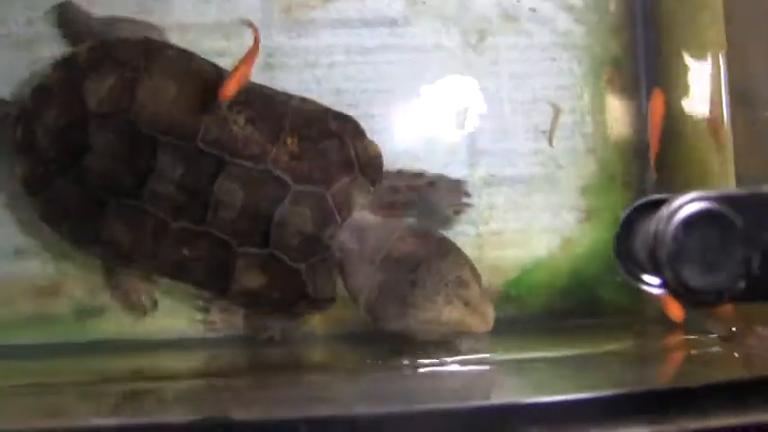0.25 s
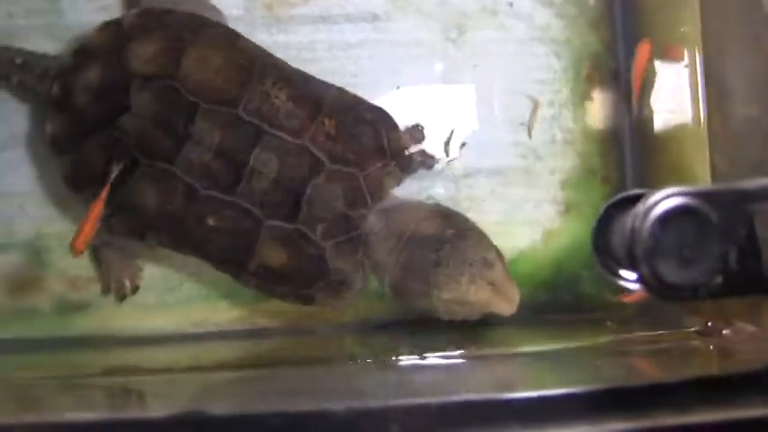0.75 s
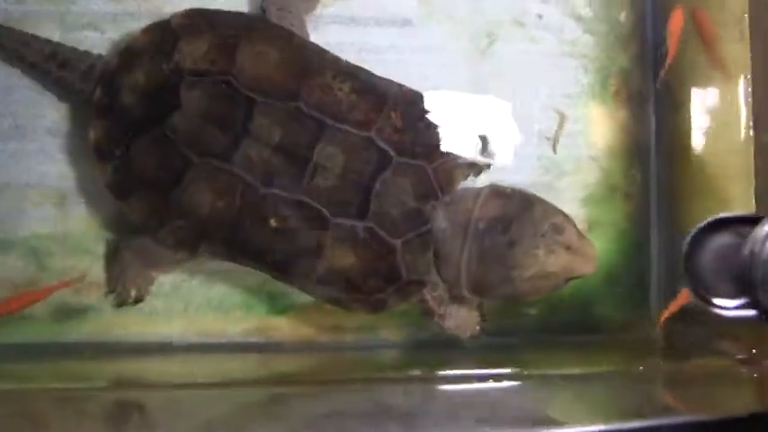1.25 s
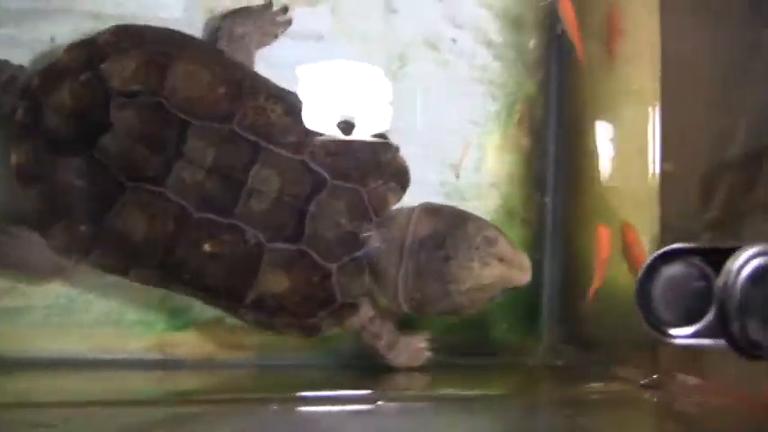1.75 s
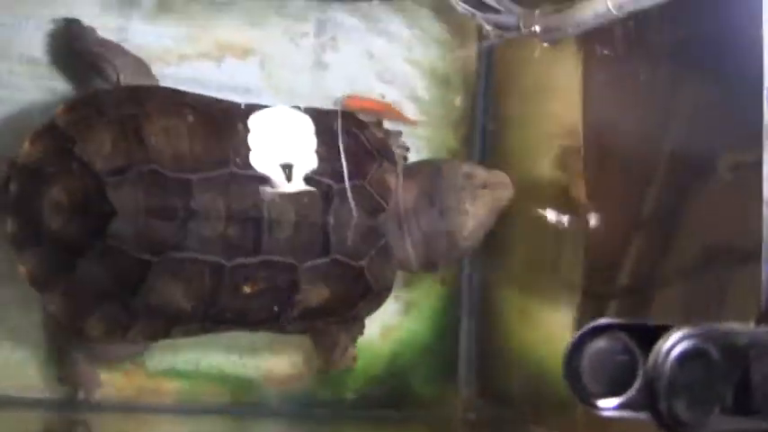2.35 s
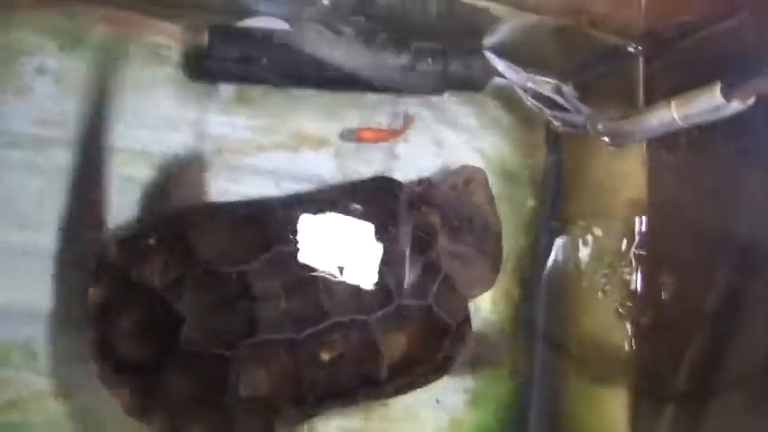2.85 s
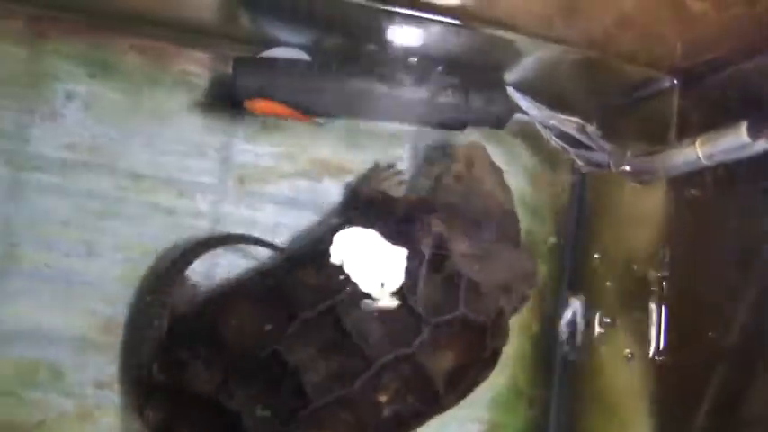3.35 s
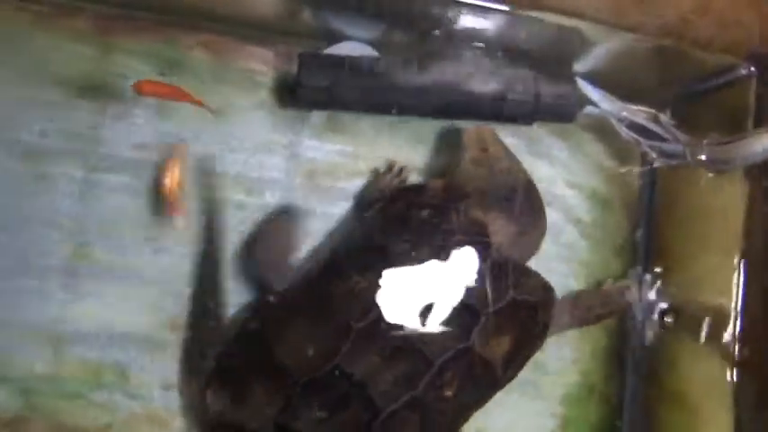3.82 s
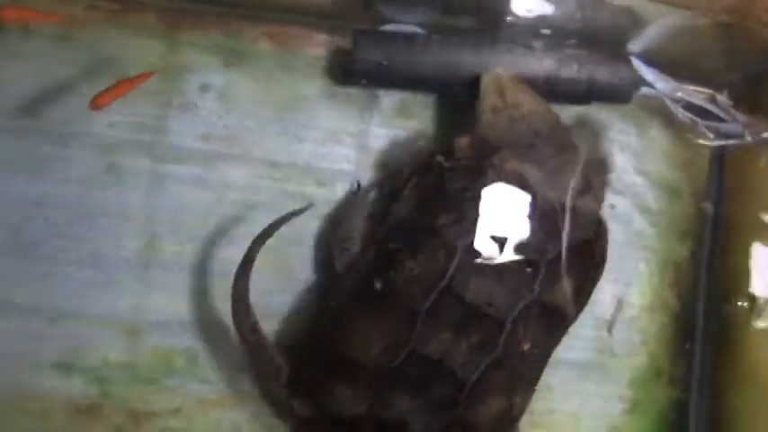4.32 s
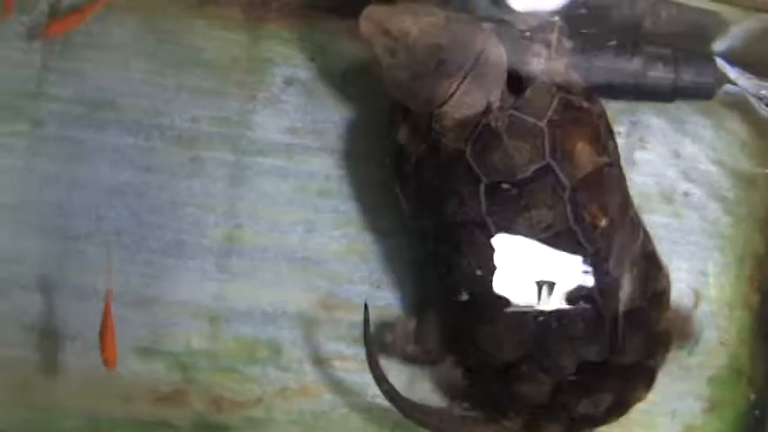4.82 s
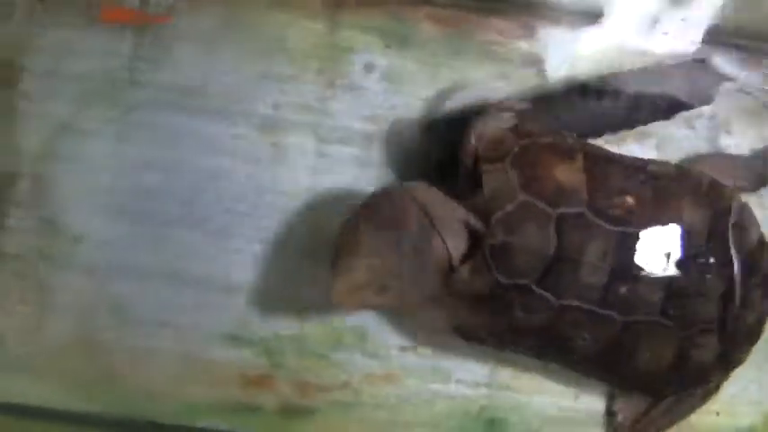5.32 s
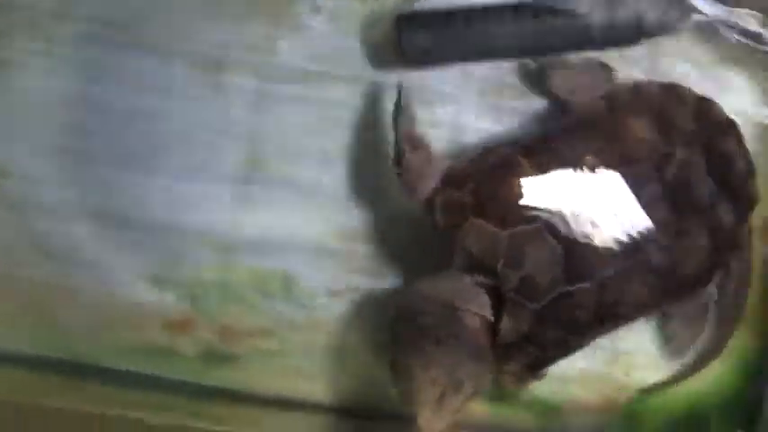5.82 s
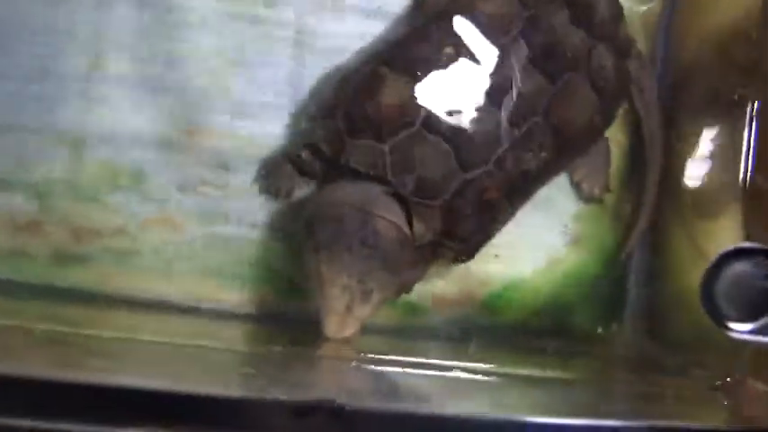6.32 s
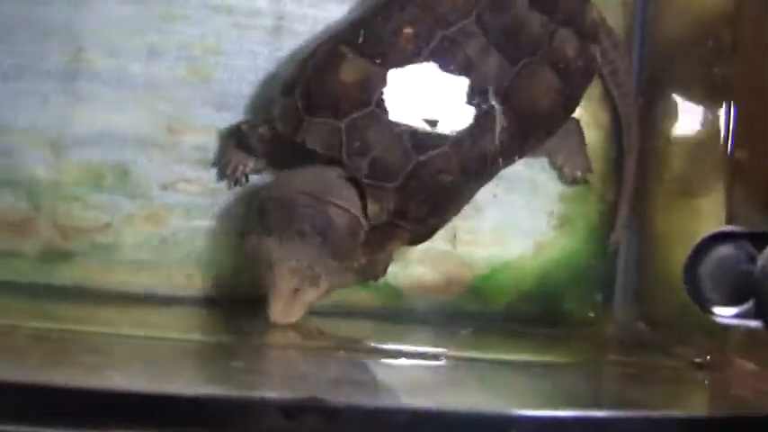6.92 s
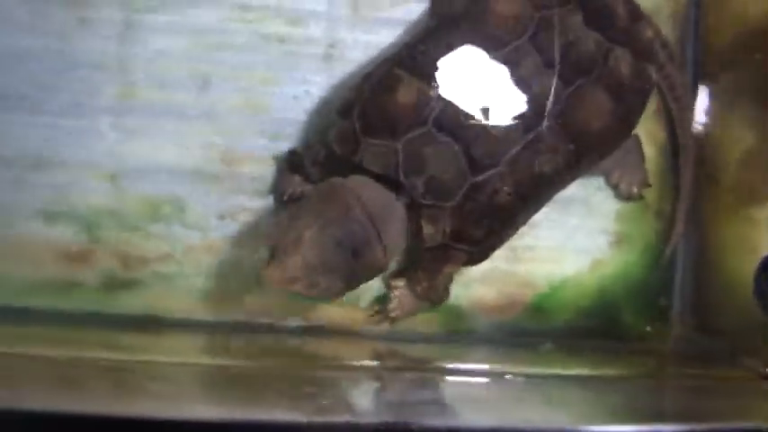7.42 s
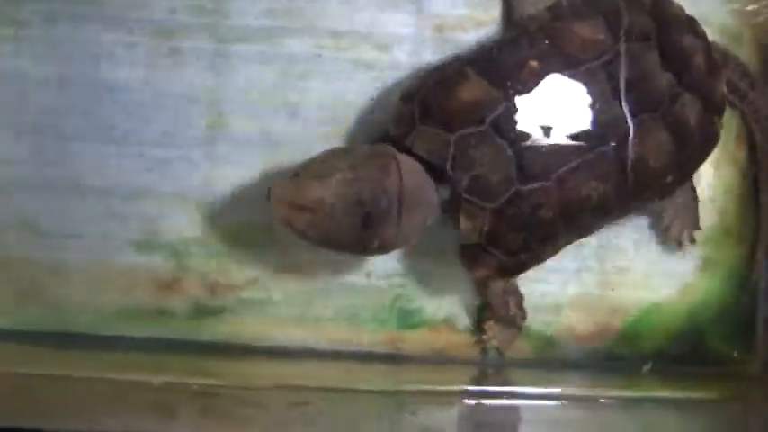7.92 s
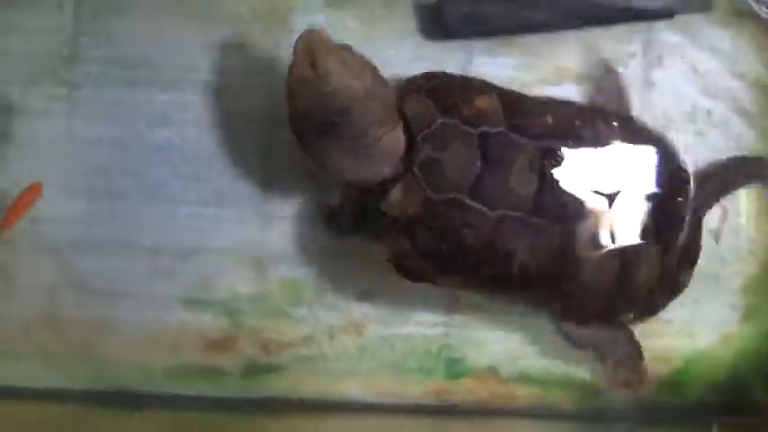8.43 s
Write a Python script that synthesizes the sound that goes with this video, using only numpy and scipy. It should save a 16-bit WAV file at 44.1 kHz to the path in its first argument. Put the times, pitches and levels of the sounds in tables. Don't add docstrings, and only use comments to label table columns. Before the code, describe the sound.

Close above a shallow glass tank in a small quiet room, a turtle bumps and claws the panes. An early knock and sparse ticks lead to a claw skid and one hard, rattling blow. Firm hollow knocks and grinding follow, then lighter taps thin out to almost nothing before two brief late scrabbles. A low pump hum and soft hiss continue underneath.

```python
import sys
import numpy as np
from scipy import signal
from scipy.io import wavfile

SR = 44100
rng = np.random.default_rng(int(sys.argv[2]) if len(sys.argv) > 2 else 0)


def how_loud(loudness_db):
    steps = np.asarray(loudness_db, float) / 20
    return 10 ** steps


def transcribe(u):
    v = np.clip(np.atleast_2d(u).T, -1, 1)
    q = np.round(v * 32767).astype(np.int16)
    wavfile.write(sys.argv[1], SR, q)


N = 382347


def rms_one(x):
    return x / np.sqrt(np.mean(x ** 2) + 1e-20)


def at_hz(points, hz, axis=1):
    points = np.array(points)
    return np.interp(np.log(hz), np.log(points[:, 0]), points[:, axis])


def in_time(rows, axis=1, outside=-140):
    rows = np.array(rows)
    return np.interp(np.arange(N) / SR, rows[:, 0], rows[:, axis], outside, outside)


def band(x, low_hz, high_hz, order=2):
    edges = np.clip([low_hz, high_hz], 10, SR * .45)
    return signal.sosfilt(signal.butter(order, edges, "band", fs=SR, output="sos"), x)


def drift(rate_hz):
    r = np.exp(-80 * np.pi * rate_hz / SR)
    slow = signal.lfilter([1], [1, -2 * r, r * r], rng.standard_normal(N // 40 + 2002))[2000:]
    return np.interp(np.arange(N) / 40, np.arange(len(slow)), rms_one(slow))


def ring(x, hz, t60):
    r, w = how_loud(-60 / (t60 * SR)), 2 * np.pi * hz / SR
    return signal.lfilter([0, np.sin(w)], [1, -2 * r * np.cos(w), r * r], x + 1e-18)


def grit(per_s, spread_db):
    sizes = how_loud(spread_db * np.minimum(rng.exponential(1, N), 5)) * rng.choice([-1, 1], N)
    return rms_one(sizes * (rng.random(N) < per_s / SR))


def half_octaves():
    edges = 20 * 2 ** np.arange(0, 10, .5)
    return zip(edges, edges[1:], np.sqrt(edges[1:] * edges[:-1]))


def panes():
    # (frequency [Hz], level [dB], t60 [s],
    # extra when struck in the corner [dB], extra when struck on the long wall [dB])
    modes = [(88.6, -15.5, 0.52, 8, 2.5), (161.3, -2.5, 0.2, -4, -1), (207.4, 2.5, 0.088, -1, -1),
             (247.3, 0, 0.088, 1.5, 4), (283, 4.5, 0.044, -4.5, -1), (319, -5, 0.12, 1.5, -1.5),
             (383, -12, 0.3, -1.5, -5.5), (396, -14.5, 0.1, -6.5, -3), (446.4, -21.5, 0.27, 3.5, 0),
             (532, -9.5, 0.11, 1.5, 0), (583, -19.5, 0.087, 8, -15), (604.5, -8.5, 0.078, -2, 5.5),
             (659, -7, 0.12, -2, -3), (703.7, -3.5, 0.08, -1, 3), (789, -16.5, 0.16, -1.5, -16.5),
             (914, -10, 0.092, 4, -13.5), (1036.6, -5, 0.047, 1.5, 4), (1144, -6.5, 0.054, -4, 5),
             (1172, -13, 0.11, 4.5, 3), (1302, 4, 0.031, -5, 0), (1390, -7.5, 0.079, 3.5, 0.5),
             (1476, -5.5, 0.049, 1, 1.5), (1725, -13.5, 0.14, -1.5, -7.5), (1868, -22, 0.15, 3, -10.5),
             (2040, -12, 0.028, -5, 1.5), (2300, -13.5, 0.036, -8.5, 6), (198.5, -14, 0.4, -4, -1)]
    # (large panes bow in or out [sign], rebound [dB],
    # wait of the middle modes [s], wait of the large panes [s])
    places = [
        (-1, -20.5, .0001, .003),
        (1, -22.5, 0.0015, .0001),
        (1, -7, 0.0031, 0.0027),
    ]
    rebound_s = 0.01458
    knocks, place = contacts()
    time_s, knock_db = knocks[:, 0], knocks[:, 1]
    bow, rebound_db, middle_wait, large_wait = np.array(places)[place].T
    luck = rng.standard_normal((len(knocks), len(modes), 3))
    rubbing = grit(per_s=1500, spread_db=2.5) * how_loud(1.8 * drift(23.6))
    drag_db, pushes, shudder, rattle = scraping()
    middle = how_loud(-36 + 0.41 * drag_db) + how_loud(-0.5) * (shudder + rattle)
    upper, large = np.zeros(N), np.zeros(N)
    for k, (hz, mode_db, t60, *place_db) in enumerate(modes):
        colour_db = [np.interp(np.log(hz), np.log([160, 203, 310, 700, 1500]), row[2:]) for row in knocks]
        extra_db = np.array([0, *place_db])[place]
        strength = how_loud(knock_db + colour_db + mode_db + extra_db - 3.5 + 1.5 * luck[:, k, 0])
        if hz < 430:
            strength *= bow
            late = large_wait
            octaves = np.log2(hz / 250)
            shaking = how_loud(17 * octaves) * shudder + how_loud(-4.5 + 6 * octaves) * rattle
            pressure = how_loud(-27) * (how_loud(drag_db) + pushes + shaking)
        else:
            strength *= np.sign(luck[:, k, 1])
            late = 0.001022 + np.abs(luck[:, k, 2]) * 0.00245 + middle_wait * (hz < 850)
            tube_rattle = how_loud(-2.5) * rattle * (645 < hz < 730)
            pressure = how_loud(-28 - 4.2 * np.log2(hz / 700)) * (middle + tube_rattle)
        drive = how_loud(mode_db) * pressure * np.roll(rubbing, 97 * k)
        np.add.at(drive, ((time_s + late) * SR).astype(int), strength)
        rebound = strength * how_loud(rebound_db) * (130 < hz < 300)
        np.add.at(drive, ((time_s + late + rebound_s) * SR).astype(int), rebound)
        group = large if 130 < hz < 430 else upper
        group += ring(drive, hz, t60)
    swelling = band(large, 143, 374, order=3)
    return band(upper, 120, 8900, order=3) + swelling + tube()


def contacts():
    # (time [s], strength [dB], lean to the smaller panes [dB],
    # hardness [dB], gain on the deepest panes [dB])
    blows = [
        (2.1345, -37, -2, -22, -1.5),
        (3.0985, -25, -4, -0.5, 1),
        (3.141, -33, 10, -1, -5),
        (4.778, -48, 1, 6.5, -5),
        (5.123, -54, -6, 11, 6),
        (5.1945, -51, -12, 13.5, 1),
        (5.508, -52.5, -9, 5, 6),
        (5.852, -39.5, -3, 4, 0),
        (5.9455, -44, -12, -9, 8.5),
        (6.039, -50, 15, 3, -6.5),
    ]
    corner = [
        (0.1597, -26.5, 8, 2, -6),
        (2.149, -6.5, 6.5, 3.5, -8),
        (5.424, -45.5, 17, 11, -2),
    ]
    wall = [
        (3.487, -10, -5.5, -0.5, -6),
        (3.803, -22, -7.5, -2.5, -0.5),
        (3.978, -37.5, -1, -2, -5),
        (4.108, -24.5, -4, 2.5, 0),
        (4.9615, -32.5, -11, -11, -9),
        (5.4035, -38.5, 9, 1, 20),
    ]
    thuds = [(1.6451, -46, 10, 4, -8), (2.5951, -40, 0, -21, 10.5), (2.8081, -57, -8, -17, 17),
             (2.8431, -48.5, 2, -27, 7), (2.9751, -53, 20, -16, -7), (3.0131, -40, -7, -17, -1.5),
             (3.3211, -50, -13, -7, 6.5), (3.8891, -42.5, -15, 6.5, 2), (4.2701, -47, -9, -14, 7),
             (4.3351, -46, -8, -3.5, -5), (8.4815, -50.5, -1.5, -17.5, 5.5), (8.5705, -46, -3, -5, 0),
             (0.175, -31, 15, -27, -6), (0.187, -33.5, 7, -29, 0)]
    raps = [
        (2.108, -50.5, 2, 15, 0),
        (2.666, -68, -7, 25, -1.5),
        (2.795, -64, -20, 22.5, -2),
        (4.301, -50, 4, 19, -1.5),
        (4.406, -52, -14, 26.5, -4),
        (6.012, -59.5, -3.5, 17.5, -1.5),
        (8.101, -56.5, 1.5, 23, 1),
        (8.124, -59.5, 3.5, 24, 3.5),
        (8.13, -63, 4.5, 10, -3.5),
    ]
    # (table, high modes against middle modes [dB], place)
    kinds = [(blows, -10, 0), (corner, -10, 1), (wall, -10, 2), (thuds, 1, 0), (raps, -28, 0)]
    knocks, place = [], []
    for table, fall_db, where in kinds:
        for s, db, lean_db, hard_db, deep_db in table:
            pane_db = (deep_db - lean_db / 2, -lean_db / 3, lean_db / 2)
            knocks.append((s, db, *pane_db, hard_db, hard_db + fall_db))
            place.append(where)
    return np.array(knocks), np.array(place)


def scraping():
    # (time [s], pressure [dB])
    drags = [
        [(2.36, -60.5), (2.78, -65.5), (3.07, -49), (3.25, -55.5), (3.45, -78), (4.08, -62), (4.52, -72),
         (4.8, -68), (5.08, -63), (5.37, -56), (5.68, -71), (6.0, -64), (6.15, -80)],
    ]
    # (time [s], pressure [dB])
    shudders = [
        [(2.18, -42), (2.205, -28), (2.245, -31.5), (2.255, -41), (2.282, -50), (2.292, -44), (2.36, -57),
         (2.42, -75)],
        [(8.06, -50.5), (8.09, -49.5), (8.14, -50.5), (8.18, -72)],
        [(8.54, -52.5), (8.58, -54), (8.67, -62)],
    ]
    # (time [s], length [s], pressure [dB])
    nudges = [(2.687, 0.054, -71), (2.857, 0.061, -56), (2.89, 0.036, -56), (3.022, .06, -50),
              (3.093, 0.029, -37), (3.333, 0.051, -51), (3.594, 0.05, -55), (3.7, 0.068, -75),
              (4.027, 0.03, -53.5), (4.19, 0.046, -48.5), (4.44, 0.055, -55), (4.622, 0.1, -59.5),
              (4.683, 0.11, -55), (4.932, 0.03, -51), (4.702, 0.077, -61), (5.52, 0.077, -52),
              (5.61, 0.046, -65), (5.732, 0.043, -67), (5.87, 0.05, -46), (6.075, 0.042, -69)]
    drag_db = np.max([in_time(stroke, outside=-300) for stroke in drags], axis=0)
    pushes = np.zeros(N)
    for s, length, db in nudges:
        length = min(length, .1)
        pushes += how_loud(in_time([(s - length, db - 20), (s, db), (s + length, db - 20)]))
    shudder = sum(how_loud(in_time(stroke)) for stroke in shudders[1:])
    return drag_db, pushes, shudder, how_loud(in_time(shudders[0]))


def tube():
    # (time [s], level [dB])
    bounces = [(2.168, -21), (2.194, -22), (2.209, -25), (2.224, -30), (2.236, -23.5), (2.242, -32),
               (2.263, -34), (2.272, -36), (2.287, -30.5), (2.32, -37), (2.345, -42.5), (2.39, -61)]
    s, db = np.transpose(bounces)
    clicks = np.zeros(N)
    clicks[(s * SR).astype(int)] = how_loud(db)
    return band(ring(clicks, hz=668, t60=0.066), 300, 1500)


def claws():
    # (time [s], level [dB], brightness [dB per octave])
    skids = [
        [(1.62, -82, -20), (2.064, -79, -20), (2.082, -40, -4), (2.093, -49, -5), (2.11, -54, 2),
         (2.128, -63, -6), (2.16, -62, -8)],
        [(2.2, -67, -3), (2.25, -60, -11), (2.3, -72.5, -16), (2.4, -77, -8)],
        [(2.4, -74, -14.5), (3.216, -75.5, -8), (3.45, -78, 8)],
        [(3.95, -71, -13), (4.2, -79, -3.5), (4.225, -63.5, -2), (4.3, -61.5, -4), (4.36, -76, -3),
         (5.15, -82, -20), (5.24, -74.5, -10), (6.1, -82, -9.5)],
        [(6.54, -95.5, -11.5), (6.62, -82, -11), (6.92, -94, -9.5)],
        [(8.0, -73.5, -8.5), (8.162, -69.5, -19.5), (8.3, -85, 5.5)],
        [(8.5, -57.5, -13), (8.544, -60.5, -17), (8.67, -80, -16)],
    ]
    # (frequency [Hz], width [Hz], level [dB])
    glass = [(2080, 160, -1.5), (3010, 310, 1), (3640, 620, -5.5), (4400, 980, -3.5), (5494, 1430, 0),
             (6540, 1100, -9)]
    source, out = grit(per_s=7300, spread_db=2.0) * how_loud(2 * drift(160)), np.zeros(N)
    t = np.arange(SR // 8) / SR
    for s, peak_db, top_hz, ms, octaves in slips():
        at = int(s * SR)
        shape = (1 - np.exp(-t / 0.00081)) * np.exp(-t * 1000 / ms)
        burst = band(source[at:at + len(t)] * shape[:N - at], top_hz / 2 ** octaves, top_hz)
        out[at:at + len(t)] += how_loud(peak_db - 4.5) * burst / np.max(np.abs(burst))
    rough = np.roll(source, 5000) * how_loud(4.5 * drift(35))
    dull, bright = rms_one(band(rough, 1000, 4000)), rms_one(band(rough, 3500, 6200))
    for stroke in skids:
        tilt_db = in_time(stroke, axis=2, outside=0)
        out += how_loud(in_time(stroke) + 1.0) * (how_loud(-tilt_db / 2) * dull + how_loud(tilt_db / 2) * bright)
    rings = np.zeros(N)
    for hz, width_hz, level_db in glass:
        r = np.exp(-np.pi * width_hz / SR)
        pole = [1, -2 * r * np.cos(2 * np.pi * hz / SR), r * r]
        zeros = (1 - r * r) / 2 * np.array([1, 0, -1])
        rings += how_loud(level_db) * signal.lfilter(zeros, pole, out + 1e-18)
    return band(0.89 * out + .5 * rings, 300, 12000, order=1)


def slips():
    # (time [s], peak [dB], top [Hz], length [ms])
    scratches = [(0.1589, -27, 8500, 6.8), (0.4352, -28, 6940, 11), (2.097, -19.5, 6000, 3.7),
                 (2.106, -31, 6500, 10), (2.114, -34, 6500, 6.8), (2.1498, -7, 5640, 4),
                 (2.6648, -34.5, 4270, 5.7), (2.6863, -35, 6560, 20), (2.7112, -38, 6600, 4.9),
                 (2.912, -34.5, 7060, 8), (3.0365, -34, 8290, 13), (3.1155, -22.5, 2500, 12),
                 (3.281, -32.5, 3530, 9), (3.803, -28.5, 3320, 12.5), (3.848, -38, 2770, 7.4),
                 (4.0066, -30.5, 2840, 7.8), (4.3125, -41, 9170, 11), (4.341, -42.5, 5600, 7),
                 (4.4305, -39, 10500, 5), (5.107, -38.5, 7060, 6.2), (5.1195, -39, 4220, 6.4),
                 (5.132, -33, 6500, 4), (5.1572, -36, 6100, 7.6), (5.7814, -40.5, 8000, 5),
                 (5.79, -43, 4000, 14), (5.8506, -30, 5950, 8.1), (6.3828, -41, 6300, 9.1),
                 (8.138, -27, 7000, 3), (8.555, -25.5, 6820, 3.2), (8.561, -36, 6500, 9)]
    taps = [(0.0705, -42, 5580, 14), (1.5346, -38, 10800, 7.9), (1.647, -25.5, 2620, 1.6),
            (1.7854, -38, 3500, 7), (1.8917, -37.5, 5600, 8.7), (1.902, -40, 7600, 5.5),
            (2.0223, -45, 6000, 32), (2.047, -22.5, 9100, 11), (2.9781, -44, 8600, 88),
            (3.099, -20.5, 5300, 6.7), (3.112, -30, 6500, 8.7), (3.1438, -32, 4400, 4.4),
            (3.263, -35.5, 7900, 8.4), (2.907, -35.5, 2380, 8.8), (5.12, -40.5, 2200, 6),
            (5.165, -49, 2500, 14), (5.205, -46, 2200, 18), (3.3303, -44, 5040, 23),
            (3.461, -44.5, 6360, 58), (3.489, -19.5, 3640, 8.8), (3.9714, -46.5, 7240, 35),
            (4.1073, -36.5, 3600, 6.5), (4.405, -39, 3550, 5.5), (4.554, -27.5, 8140, 5.4),
            (4.6292, -41, 6200, 11), (4.6878, -32.5, 7900, 25), (4.7255, -29.5, 2970, 10.7),
            (4.7666, -43, 4540, 11), (4.786, -43, 9540, 9), (5.229, -37, 11400, 8.7),
            (5.8242, -35.5, 8050, 9.3), (5.9464, -44, 5530, 8.6), (8.063, -40, 3600, 27.3),
            (8.091, -24.5, 3770, 5), (8.1025, -33.5, 7130, 5), (8.5385, -25.5, 7020, 3),
            (8.541, -21.5, 6600, 2.5)]
    # (time [s], peak [dB], top [Hz])
    touches = [(0.381, -48, 6900), (1.702, -45, 4880), (2.5675, -46.5, 5300), (2.7447, -45.5, 9080),
               (3.3576, -41.5, 8140), (3.5618, -49, 4480), (3.8931, -47, 3850), (3.9215, -49, 8780),
               (4.17, -42.5, 4520), (4.806, -45, 3730), (4.992, -54, 4510), (5.1954, -42, 6200),
               (5.4034, -43, 3380), (5.424, -56, 3000), (5.6755, -45.5, 7000), (5.8, -43, 2080),
               (6.001, -44, 7430), (6.04, -41, 3640), (8.263, -46.5, 6180), (8.113, -34, 3500),
               (8.1208, -36, 3500), (8.128, -33, 4500), (8.276, -48, 7830), (8.499, -31.5, 4200),
               (8.528, -29, 3000), (5.142, -42, 6000)]
    clicks = [(2.0795, -28.5, 6900, 3.5), (2.084, -29, 6800, 5), (8.0605, -44, 7500, 5),
              (8.092, -34.5, 7500, 3), (8.144, -34.5, 5500, 3), (8.552, -26.5, 7500, 3.4),
              (2.5032, -41.5, 1770, 27), (2.9432, -41, 6700, 17), (3.1856, -40, 11700, 4.9),
              (3.6535, -36, 14300, 5.8), (4.0262, -39, 1510, 7.2), (4.87, -49.5, 5980, 35),
              (5.368, -50, 6600, 8.1), (5.422, -55, 2650, 12), (5.518, -34, 14500, 1.3),
              (5.5258, -26.5, 16000, 2.1), (6.56, -46.5, 1480, 92), (6.62, -53, 1640, 60),
              (6.76, -50.5, 1597, 86), (8.4965, -22.5, 7540, 2.7)]
    ticks = [(4.0765, -48.5, 5500, 10), (4.264, -46, 14000, 5), (4.365, -50, 8500, 8),
             (4.421, -41, 14000, 4), (4.468, -49, 5500, 5.1), (5.133, -38, 1290, 12),
             (5.141, -39, 1820, 6.7), (5.161, -42.5, 1800, 14), (5.762, -49.5, 7560, 4),
             (5.782, -36, 14000, 3.4), (5.7955, -44, 13500, 3.5), (5.801, -47, 13500, 4.5),
             (5.8025, -40, 8000, 3.3), (5.956, -44, 8000, 5.6), (6.017, -49, 8500, 6),
             (8.528, -31.5, 6770, 11.8), (8.54, -53, 9400, 4)]
    chirps = [
        (1.6471, -41, 2300, 7),
        (1.7871, -44, 2230, 9.5),
        (1.8, -53, 3200, 13),
        (3.5611, -39, 11950, 6.5),
        (4.9951, -50.5, 3305, 2.8),
        (6.5511, -42, 547, 12),
        (8.104, -38, 4630, 5),
        (8.527, -27, 4800, 8.2),
    ]
    touch_ms = 6.8
    timed_touches = [(*row, touch_ms) for row in touches]
    kinds = [(scratches, 3.1), (taps + timed_touches, 2.05), (clicks + ticks, 0.75), (chirps, 0.315)]
    return [(*row, octaves) for rows, octaves in kinds for row in rows]


def squeak():
    # (time [s], level [dB])
    slide = [(1.69, -71), (1.705, -60.5), (1.765, -60.5), (1.79, -67), (1.81, -61), (1.84, -71.5)]
    # (frequency [Hz], level [dB], t60 [s])
    modes = [(2200, 0, 0.048), (2850, -4, 0.055), (3265, -2, 0.044)]
    sliding = np.zeros(N)
    for hz, db, t60 in modes:
        sliding += how_loud(db + 2.62 * drift(30)) * ring(rng.standard_normal(N), hz, t60)
    return how_loud(in_time(slide) - 1.5) * rms_one(sliding)


def room(x):
    # (frequency [Hz], t60 [s], level [dB])
    decay = [(95, 0.57, 0.5), (211.2, 0.33, -7), (380, 0.36, -2.5), (570, 0.31, -2), (800, 0.28, -4),
             (1200, 0.25, -2), (3000, 0.18, -5), (7630, 0.28, -7.5)]
    t = np.arange(SR) / SR
    out, white = 0, rng.standard_normal((2, SR))
    for low, high, hz in half_octaves():
        mid, side = band(white, low, high)
        fade = how_loud(-60 * t / at_hz(decay, hz)) * (1 - np.exp(-t / 0.0032))
        wide = np.clip(0.11 + 0.085 * np.log2(hz / 250), .03, 1) * np.where(hz > 200, 1, .08)
        echo = fade * (mid + wide * side * [[1], [-1]])
        out = out + how_loud(at_hz(decay, hz, axis=2)) * echo / np.sqrt(np.sum(fade ** 2))
    return signal.oaconvolve(out, x[None], axes=1)[:, :N]


def pump():
    # (multiple of the motor's turning rate [1], level [dB rms])
    harmonics = [(1, -77), (2, -77), (3, -67), (4, -82), (5, -78), (12, -85), (24, -85)]
    # (frequency [Hz], level [dB rms])
    mains = [(49.3, -88), (99, -81), (101, -74), (300.1, -76), (542.6, -74), (592, -82), (600, -84)]
    motor_hz = 31.55
    t = np.arange(N) / SR
    lines = [(k * motor_hz, db) for k, db in harmonics] + mains
    wobble, hum = drift(0.93), np.zeros(N)
    for (hz, db), start in zip(lines, rng.uniform(0, 5.07, len(lines))):
        hum += np.sqrt(2) * how_loud(db) * np.sin(2 * np.pi * hz * t + .001 * hz * wobble + start)
    return hum


def hiss():
    # (frequency [Hz], density [dB per Hz])
    colour = [(22, -5), (45, -17), (70, -2), (95, -6), (160, -0.5), (300, -5), (550, -3.5), (900, -9.5),
              (2000, -13), (4000, -15), (8000, -20.5), (15500, -24)]
    # (frequency [Hz], likeness [0 to 1])
    likeness = [(60, 1), (180, 0.6), (550, 0.23), (1650, 0.54), (4970, 0.62), (15000, 0.46)]
    out, white, swell = 0, rng.standard_normal((2, 2, N)), drift(1.8)
    for k, (low, high, hz) in enumerate(half_octaves()):
        mid, side = band(white[k % 2], low, high)
        alike = at_hz(likeness, hz)
        gain = how_loud(at_hz(colour, hz) + .5 * np.roll(swell, 20011 * k))
        out = out + gain * (np.sqrt(1 + alike) * mid + np.sqrt(1 - alike) * side * [[1], [-1]])
    balance_db = np.array([[-.15], [.15]])
    return how_loud(-60.5 + balance_db) * rms_one(out)


def scene():
    knocks, scratches = panes(), claws() + squeak()
    askew = how_loud(-15.5) * np.roll(band(knocks, 320, 440), 30)
    askew -= how_loud(-16.5) * band(knocks, 593, 1500)
    askew += how_loud(-12.5) * np.roll(scratches, 61)
    direct = knocks + askew * [[1], [-1]] + scratches * how_loud(np.array([[.2], [-.2]]))
    return direct + room(knocks + scratches) + pump() + hiss()


def band_limit(x):
    return signal.sosfilt(signal.butter(12, 15830, fs=SR, output="sos"), x)


def record(dry):
    ceiling = .9
    rounded = ceiling * np.tanh(dry / ceiling)
    top_cut = signal.cheby2(12, 60, 17550, fs=SR, output="sos")
    return band_limit(signal.sosfilt(top_cut, rounded))


dry = scene()
out = record(dry)
transcribe(out)
```